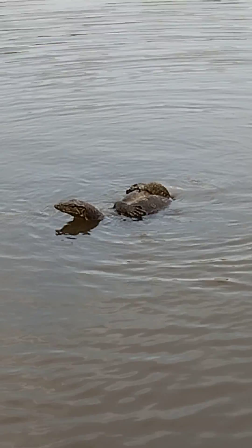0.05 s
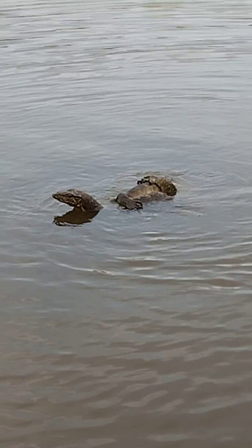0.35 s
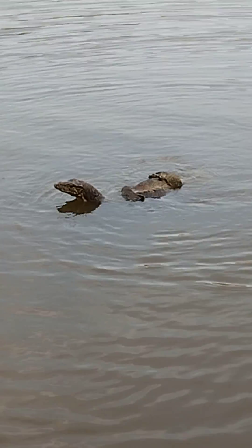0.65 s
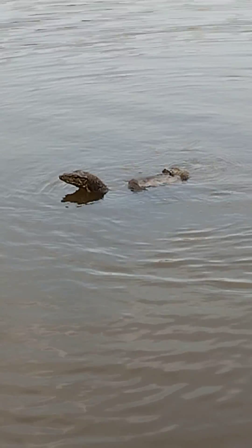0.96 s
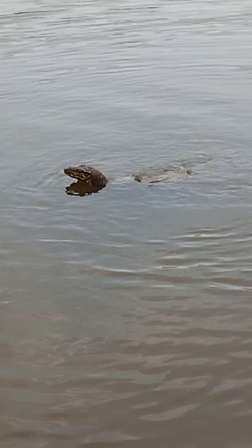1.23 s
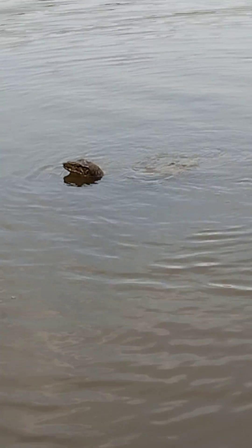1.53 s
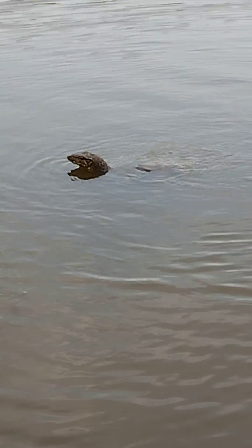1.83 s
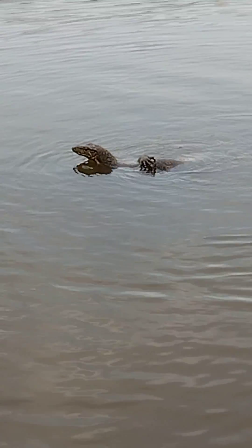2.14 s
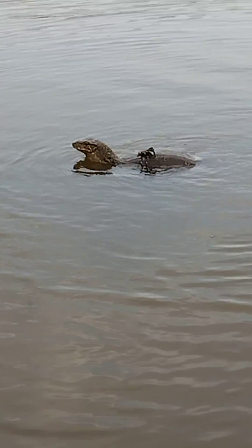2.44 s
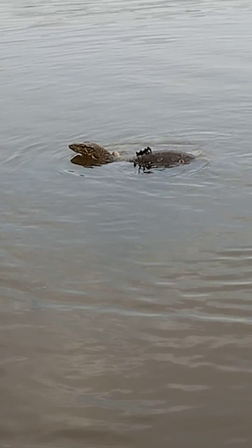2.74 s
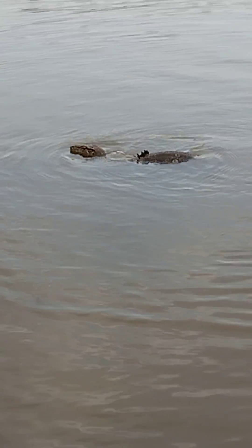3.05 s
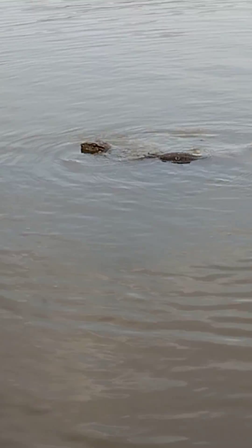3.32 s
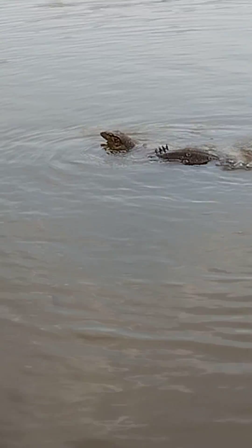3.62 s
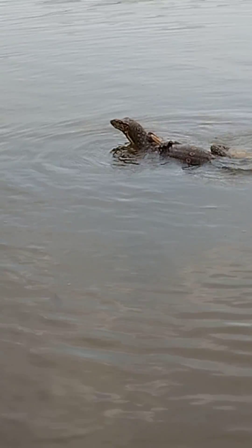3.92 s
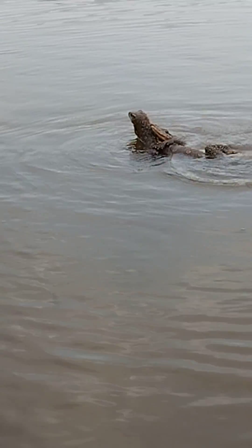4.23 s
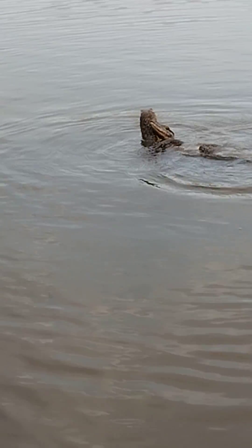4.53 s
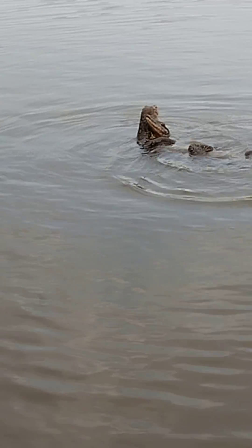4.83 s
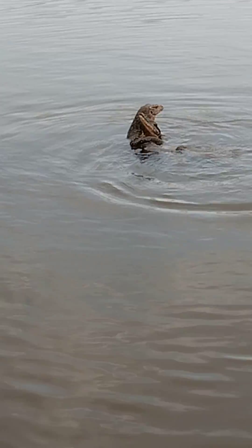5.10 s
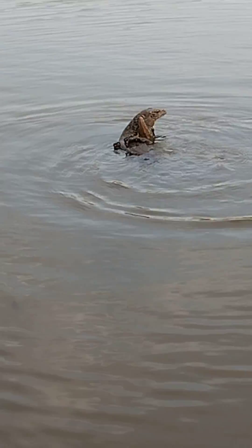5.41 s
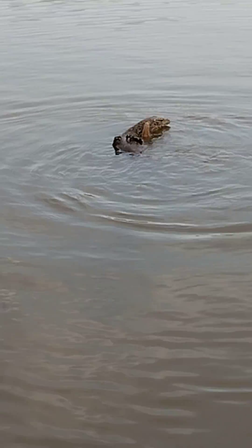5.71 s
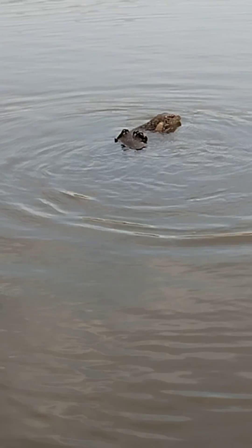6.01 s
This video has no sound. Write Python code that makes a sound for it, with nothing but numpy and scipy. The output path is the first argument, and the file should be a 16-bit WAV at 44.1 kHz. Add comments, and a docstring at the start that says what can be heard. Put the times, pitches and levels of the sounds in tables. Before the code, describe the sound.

Heard from the edge of a pond, a steady chorus of twittering birds and hissing insects sits over a faint rumble and far motor hum. Nearer birds screech hoarsely, interrupted by one sharp, close click. Short pips, thin high whistles and dry chattering calls follow, echoing lightly among the trees. In the second half, faint bubbles pop nearby as the birds give a few sliding screeches and a squeal.

```python
"""Rasping screeches come first, from birds squabbling in the trees round a pond. Their thin whistles,
dry chacks and falling pips, each a wavering tone from the syrinx, reach the microphone scattered by
the foliage. Farther back, small birds twitter and insects hiss over a low distant rumble and a motor.
Close to the microphone a small hard thing clicks sharply on the right; later, bubbles plop faintly."""
import sys
import numpy as np
from scipy import signal
from scipy.io import wavfile

SR = 44100
rng = np.random.default_rng(int(sys.argv[2]) if len(sys.argv) > 2 else 0)


def inscribe(sig):
    """Save sig as 16-bit PCM at rate SR to the path in sys.argv[1].

    A 1-D sig is mono; a 2-D sig holds one channel per row.
    Samples are clipped to [-1, 1] before scaling.
    """
    pcm = np.round(np.clip(np.atleast_2d(sig).T, -1, 1) * 32767)
    wavfile.write(sys.argv[1], SR, pcm.astype(np.int16))


N = 267246

# Call levels are at the bird, before beak and trees. tilt_db is added per harmonic;
# rasp_share is the pitch jitter as a share of the pitch.
# slurred screeches: start_s, length_s, start_hz, middle_hz, end_hz, level_db, tilt_db, rasp_share
SCREECH_NOTES = [(0, 0.12, 2084, 2038, 2034, -42.5, -8, 0.071),
                 (.132, .15, 2080, 2040, 1950, -42.5, -11, 0.076),
                 (0.551, 0.049, 2480, 2403, 2350, -48, 15.5, 0.086),
                 (.665, 0.056, 2350, 2197, 2085, -38, -8, 0.052),
                 (.809, 0.066, 2410, 2302, 2160, -41, -1, 0.066),
                 (0.962, 0.09, 2397, 2060, 2033, -42.5, -12, 0.067),
                 (1.123, 0.074, 2322, 2143, 2243, -39.5, -7, 0.055),
                 (4.012, 0.064, 1874, 2015, 2040, -42.5, -15.5, 0.092)]
# short dry chacks: start_s, length_s, pitch_hz, level_db, tilt_db, rasp_share
CHACK_NOTES = [(0.372, 0.021, 1680, -46, -12.5, 0.067), (0.424, 0.013, 1535, -45, -8, 0.077),
               (1.963, 0.029, 1676, -42.5, 3.5, 0.051), (2.074, 0.04, 1656, -42.5, 2.5, 0.049),
               (2.23, 0.049, 1695, -44.5, 4.5, 0.066), (2.386, 0.069, 1670, -57.5, 10, 0.059),
               (2.6, 0.044, 1696, -45, 3.5, 0.066), (2.713, 0.082, 1720, -45, -1, 0.088),
               (2.864, 0.064, 1683, -44.5, 6.5, 0.06), (3.04, 0.069, 1566, -45, 6.5, 0.087),
               (3.302, 0.082, 1691, -44, 3.5, 0.041), (3.516, 0.048, 1708, -46, -9, 0.079),
               (4.413, 0.0064, 1670, -40.5, -12, 0.057), (4.562, 0.0079, 1604, -42.5, -4.5, 0.054),
               (4.604, 0.037, 1700, -41.5, -4, 0.087), (4.85, 0.084, 1754, -52.5, 2.5, 0.068),
               (4.978, 0.013, 1562, -46.5, 2, 0.13), (5.224, 0.01, 1654, -44.5, 4, 0.051),
               (5.452, 0.027, 1620, -46, 7, 0.064), (5.647, 0.026, 1782, -46.5, -8, 0.079),
               (5.884, 0.018, 1684, -49, -11, 0.046), (5.988, 0.018, 1640, -40.5, -9.5, 0.028)]
# a low snarl in two pushes: start_s, length_s, start_hz, end_hz, level_db, tilt_db
SNARL_NOTES = [(4.116, 0.1033, 1254, 1235, -43, 2.5), (4.212, .094, 1168, 1099, -44.5, 1)]
# quick falling pips: start_s, length_s, start_hz, level_db
PIP_NOTES = [(0.553, 0.0133, 3047, -42.5), (0.806, 0.0076, 2870, -42), (0.96, 0.012, 2850, -42.5),
             (1.117, 0.011, 2830, -45.5), (1.279, 0.024, 2934, -45), (1.318, 0.015, 2680, -43),
             (1.349, 0.019, 2330, -49), (1.396, 0.011, 2494, -44.5), (1.468, 0.0055, 1880, -54.5),
             (1.495, 0.016, 2777, -46), (1.528, 0.02, 2260, -51.5), (1.564, 0.0088, 2670, -46.5),
             (1.664, 0.0076, 2470, -50), (1.692, 0.017, 2900, -42.5), (1.723, 0.0081, 2950, -45),
             (1.785, .007, 1870, -57), (1.811, 0.024, 2920, -44.5), (1.844, 0.008, 2860, -47.5),
             (2.54, 0.0069, 2890, -53.5), (2.754, 0.0078, 3390, -44), (3.116, 0.0049, 2635, -47.5),
             (3.542, 0.012, 3087, -44), (3.955, 0.031, 2940, -48.5), (4.015, 0.0088, 2350, -50)]
# timbre of each voice, from the fundamental up: harmonic_db
SCREECH_TIMBRE = [-22.5, 8.5, -22, -22.5]
CHACK_TIMBRE = [-27, -2, 2, -11.5]
SNARL_TIMBRE = [-40, -6, -3.5, -1]
PIP_TIMBRE = [-3.5, -11, -29]
# thin whistles, and hoarse calls from far off: start_s, length_s, start_hz, end_hz, level_db
WHISTLE_NOTES = [(.02, 0.33, 6060, 6200, -60), (.57, 0.086, 2840, 2777, -55.5),
                 (.59, 0.058, 5900, 6080, -60), (.875, 0.17, 6300, 6400, -65),
                 (1.3, 0.29, 6050, 6080, -59.5), (1.56, 0.22, 6200, 6500, -58.5),
                 (1.87, 0.62, 5950, 5810, -60), (2.62, 0.52, 5980, 5820, -62),
                 (3.424, 0.4, 6010, 5790, -56), (3.848, 0.045, 4070, 4047, -45),
                 (5.734, 0.31, 6550, 6680, -64.5), (5.93, 0.13, 5880, 5880, -55)]
HOARSE_NOTES = [(2.55, 0.081, 2830, 2790, -64), (2.75, 0.36, 2557, 2373, -66),
                (4.91, .23, 1430, 1608, -66.5), (4.98, 0.71, 2330, 2224, -72)]
# drawn-out calls, one curve each: time_s, pitch_hz, level_db, tilt_db
SINKING_CURVE = [(3.745, 1698, -39.5, 6), (3.811, 1584, -43, 6), (3.838, 1385, -43, 9),
                 (3.854, 1209, -45.5, 8), (3.876, 976, -50, 4)]
RISING_CURVE = [(4.64, 1565, -48, 4), (4.67, 1683, -41.5, -5), (4.695, 1916, -41, -10),
                (4.713, 2330, -40, -12), (4.752, 2418, -41.5, -14), (4.787, 2625, -51, -15)]
SQUEAL_CURVE = [(5.236, 2600, -51, 2.3), (5.256, 2800, -47, 2), (5.33, 2742, -47, 2),
                (5.39, 2684, -50, 2.3), (5.428, 2690, -48.5, 2), (5.44, 2680, -52, 1.8),
                (5.462, 2560, -46, 2.3)]
END_SLUR_CURVE = [(5.481, 1620, -42.5, 15.5), (5.503, 1467, -45.5, 13), (5.518, 1200, -50, 17),
                  (5.529, 990, -60, 20)]
# resonances of throat and beak: centre_hz, width_hz, gain_db
THROAT_RESONANCES = [(2520, 480, -3), (3670, 540, 9.5), (4370, 450, 3.5), (5140, 450, -5),
                     (6950, 1000, -2.5)]
# swell of the far birds and insects: time_s, gain_db
CHORUS_SWELL = [(0, -48), (.4, -52), (1.15, -51), (2.2, -53), (2.5, -58), (2.85, -52), (3.3, -53.5),
                (3.85, -51), (4.35, -52.5), (4.56, -58), (4.8, -52), (5.15, -57), (5.42, -51),
                (5.75, -53.5), (6.06, -54.5)]
# spectra of the insect hiss and the distant rumble: frequency_hz, relative_density_db
INSECT_SPECTRUM = [(1500, -26.5), (1950, -21), (2300, -14), (2800, -17.5), (3500, -7), (4700, -12),
                   (5600, -6), (6500, -13.5), (8000, -23), (9500, -75), (11200, -26.5), (13000, -44),
                   (15500, -38)]
RUMBLE_SPECTRUM = [(20, 3), (50, -1.5), (100, -5), (190, -6.5), (350, -14), (700, -17.5), (1300, -22),
                   (2500, -29), (6000, -57), (12000, -58)]
# how alike that noise is on the microphone's left and right: frequency_hz, correlation
STEREO_LIKENESS = [(25, 0.6), (60, 0), (125, 0.85), (250, 0.48), (500, 0.44), (1000, 0.11), (16000, 0.0045)]
# one thin insect high above the chorus: centre_hz, width_hz, level_db
SHRILL_BANDS = [(10750, 900, -80.5), (15500, 700, -92)]
# the click and two light touches after it: start_s, strength_db, tilt_db_per_octave
CLICK_HITS = [(.4617, -26, 0), (.4777, -46, -1), (.5131, -48, 5)]
# modes of the clicked thing: pitch_hz, gain_db, t60_s
CLICK_RESONANCES = [(287, -19.5, 0.053), (680, -31, 0.073), (1010, -38, 0.027), (1530, -20, 0.032),
                    (2050, -6.5, 0.02), (2450, -2, 0.0068), (3550, 3.5, 0.0042), (5940, -9, 0.0051),
                    (8470, -14, 0.0038), (11800, -12, 0.0031), (15200, -13, 0.004)]
# bubbles close by: start_s, peak_db, pitch_hz, t60_s
BUBBLES = [(3.452, -52, 2070, .03), (3.453, -59, 970, 0.031), (3.582, -54.5, 1370, 0.041),
           (3.696, -59.5, 930, 0.044), (4.619, -49, 893, 0.025), (4.620, -60, 1370, 0.024),
           (4.633, -56, 870, .03), (4.905, -44, 567, 0.016), (4.906, -51.5, 1290, 0.02),
           (4.958, -56.5, 510, 0.026)]

RASP_HZ, HISS_GAIN = 700, 3.6  # speed of the rasp, strength of the hiss it drives
ACCENT_DB, ACCENT_S = 5, 0.005  # a syllable bursts out louder, then settles
OPENING_SHARE = .08  # part of its length that a syllable takes to open


def from_db(db):
    return 10 ** (np.asarray(db) / 20)


def rms_one(x):
    return x / np.sqrt(np.mean(x ** 2) + 1e-20)


def at_hz(points, hz):
    """Read a spectrum on a log-frequency axis."""
    points_hz, values = np.transpose(points)
    return np.interp(np.log(hz), np.log(points_hz), values)


def wander(rate_hz, size, run_in=8000):
    """Smooth random drift of mean 0 and spread 1: noise through two one-pole low-passes."""
    r = np.exp(-2 * np.pi * rate_hz / SR)
    slow = signal.lfilter([1], [1, -2 * r, r * r], rng.standard_normal(size + run_in))[run_in:]
    return rms_one(slow - slow.mean())


def add(track, start_s, sound):
    """Mix a sound into a track."""
    start = int(np.clip(start_s * SR, 0, N - 1))
    track[start:start + len(sound)] += sound[:N - start]


def swell(size, attack_s, release_s):
    """Envelope of one note, with quarter-sine edges."""
    t = np.arange(size) / SR
    attack = np.sin(np.pi / 2 * np.minimum(t / attack_s, 1))
    release = np.sin(np.pi / 2 * np.minimum(t[::-1] / release_s, 1))
    return attack * release


def glide(pitches, size, jitter, jitter_hz):
    """Phase of a tone that slides unsteadily through some pitches."""
    hz = np.interp(np.linspace(0, 1, size), np.linspace(0, 1, len(pitches)), pitches)
    return 2 * np.pi * np.cumsum(hz * (1 + jitter * wander(jitter_hz, size))) / SR


def resonate(x, hz, width_hz):
    """One resonance with gain 1 at its peak."""
    return signal.lfilter(*signal.iirpeak(hz, hz / width_hz, fs=SR), x)


def resonant_noise(bands, shape):
    """Noise coloured by each resonance twice, so the valleys stay dark."""
    out = 0
    for hz, width_hz, db in bands:
        band = resonate(rng.standard_normal(shape), hz, width_hz)
        out += from_db(db) * rms_one(resonate(band, hz, width_hz))
    return out


def throat_noise():
    """Turbulent breath through a bird's throat; rms 1."""
    return rms_one(resonant_noise(THROAT_RESONANCES, N))


def syllables(notes, timbre, flutter_db_per_rasp, hiss_db, release_s=0.015, flutter_hz=260):
    """Harsh syllables: the rasp shakes pitch and loudness and drives puffs of hiss through the throat."""
    tones, breath = np.zeros(N), np.zeros(N)
    orders = np.arange(len(timbre)) + 1
    for start_s, length_s, *pitches, db, tilt_db, rasp in notes:
        size = int(length_s * SR)
        phase = glide(pitches, size, rasp, RASP_HZ)
        voice = rms_one(from_db(timbre + tilt_db * orders) @ np.sin(np.outer(orders, phase)))
        accent_db = ACCENT_DB * np.exp(-np.arange(size) / SR / ACCENT_S)
        flutter = from_db(accent_db + flutter_db_per_rasp * rasp * wander(flutter_hz, size))
        effort = from_db(db) * rms_one(flutter * swell(size, OPENING_SHARE * length_s, release_s))
        add(tones, start_s, voice * effort)
        add(breath, start_s, HISS_GAIN * rasp * effort)
    return tones + from_db(hiss_db) * breath * throat_noise()


def drawn_out(curve, rasp, hiss_db, flutter_db=4.5, flutter_hz=260):
    """One long screech whose pitch, strength and brightness follow a curve."""
    times_s, *columns = np.transpose(curve)
    size = int((times_s[-1] - times_s[0]) * SR)
    t = times_s[0] + np.arange(size) / SR
    hz, db, tilt_db = [np.interp(t, times_s, column) for column in columns]
    orders = np.arange(len(SCREECH_TIMBRE))[:, None] + 1
    gains = from_db(np.array(SCREECH_TIMBRE)[:, None] + tilt_db * orders)
    phase = glide(hz, size, rasp, RASP_HZ)
    voice = (gains * np.sin(orders * phase)).sum(0) / np.linalg.norm(gains, axis=0)
    flutter = rms_one(from_db(flutter_db * wander(flutter_hz, size)))
    effort = from_db(db) * flutter * swell(size, 0.0018, 0.006)
    out = np.zeros(N)
    add(out, times_s[0], effort * (rms_one(voice) + from_db(hiss_db) * throat_noise()[-size:]))
    return out


def over_water(x, comb_hz=685, mirror=.5):
    """The pond mirrors a call to the microphone a moment later and combs its spectrum."""
    n = np.arange(N)
    reflection = np.interp(n - SR / comb_hz, n, x, left=0)
    return (x + mirror * reflection) / np.hypot(1, mirror)


def chatter(band_hz=(1750, 7100), chack_fall_oct=0.0707, snarl_rasp=0.0685):
    """Screeches, sagging chacks that glance off the pond, a snarl; distance takes off the top."""
    chack_notes = [(start_s, length_s, hz, hz * 2 ** -chack_fall_oct, *voice)
                   for start_s, length_s, hz, *voice in CHACK_NOTES]
    snarl_notes = [(*note, snarl_rasp) for note in SNARL_NOTES]
    chacks = syllables(chack_notes, CHACK_TIMBRE, flutter_db_per_rasp=51, hiss_db=-.5)
    screeches = syllables(SCREECH_NOTES, SCREECH_TIMBRE, flutter_db_per_rasp=52, hiss_db=-1.5)
    snarl = syllables(snarl_notes, SNARL_TIMBRE, flutter_db_per_rasp=35, hiss_db=6.5)
    rising_call = drawn_out(RISING_CURVE, rasp=.035, hiss_db=-9, flutter_db=3)
    calls = screeches + from_db(2) * over_water(chacks) + snarl + rising_call
    return signal.sosfilt(signal.butter(5, band_hz, "band", fs=SR, output="sos"), calls)


def beak(x, top_hz=8600):
    """The open beak adds a narrow resonance with a dip above it, and passes little high treble."""
    peak = from_db(-6) * resonate(x, hz=5320, width_hz=260)
    dip = 0.55 * resonate(x, hz=6300, width_hz=500)
    return signal.sosfilt(signal.butter(8, top_hz, fs=SR, output="sos"), x + peak - dip)


def trees(x, direct_db, near_db, far_db, lag_s, near_t60_s=0.16, far_t60_s=1.0):
    """Three paths to the microphone: direct, quickly off nearby branches, slowly from the far banks."""
    t = np.arange(SR) / SR
    channels = []
    for side in range(2):
        twigs = rng.standard_normal((2, SR)) * (rng.random((2, SR)) < [[.03], [.15]])  # sparse echoes
        echoes = twigs * from_db(-60 * t / [[near_t60_s], [far_t60_s]]) * (t > .002)
        echoes /= np.linalg.norm(echoes, axis=1, keepdims=True)
        path = from_db(near_db) * echoes[0] + from_db(far_db) * echoes[1]
        path[int(lag_s * SR) * side] += from_db(direct_db)  # reaches the right side later
        channels.append(signal.fftconvolve(x, path)[:N])
    return np.array(channels)


def far_birds(count=1100, centre_hz=5000, pitch_spread=.1, distance_db=1.5):
    """Many small chirps at random times, pitches and distances; rms 1."""
    out = np.zeros(N)
    for (when, stretch), (pitch, loud) in zip(rng.random((count, 2)), rng.standard_normal((count, 2))):
        size = int((.03 + .05 * stretch) * SR)
        hz = centre_hz * np.exp(pitch_spread * np.clip(pitch, -3, 1.8))
        phase = glide([hz, hz * 1.03, hz * .96], size, jitter=.03, jitter_hz=304)
        chirp = np.sin(phase) * swell(size, 0.01, 0.07)
        add(out, when * N / SR, from_db(distance_db * loud) * chirp)
    return rms_one(out)


def distant_noise(spectrum, flicker_db):
    """Hiss or rumble from all round, each band with its own level, flicker and stereo width; rms 1."""
    edges_hz = np.r_[np.geomspace(18, 1500, 12), np.geomspace(1800, 16500, 16)]
    white = rng.standard_normal((2, 2, N))
    out = 0
    for k, (low, high) in enumerate(zip(edges_hz, edges_hz[1:])):
        band = signal.butter(2, [low, high], "band", fs=SR, output="sos")
        mid, side = signal.sosfilt(band, white[k % 2])
        hz = np.sqrt(low * high)
        alike = at_hz(STEREO_LIKENESS, hz)
        gain = from_db(at_hz(spectrum, hz) + flicker_db * wander(8.5, N))
        out += gain * (np.sqrt(1 + alike) * mid + np.sqrt(1 - alike) * side * [[1], [-1]])
    return rms_one(out)


def far_motor(pitch_hz=181, level_db=-74.5):
    """A motor a long way off hums, drifting slightly in level and pitch."""
    level = from_db(level_db + 0.88 * wander(2.4, N))
    return level * np.sin(glide([pitch_hz, pitch_hz], N, jitter=0.0097, jitter_hz=8.9))


def cricket():
    """Narrow, steady bands of shrilling on both sides of the microphone."""
    return resonant_noise(SHRILL_BANDS, (2, N))


def whistles(notes, waver, waver_hz, flutter_db=5.0):
    """Thin notes that waver in pitch and loudness; a deep waver turns them hoarse."""
    out = np.zeros(N)
    for start_s, length_s, *pitches, db in notes:
        size = int(length_s * SR)
        effort = swell(size, 0.0091, 0.027) * from_db(flutter_db * wander(130, size))
        tone = np.sin(glide(pitches, size, waver, waver_hz))
        add(out, start_s, from_db(db) * rms_one(tone * effort))
    return out


def ring(hits, hz, t60_s):
    """A unit hit sets a sine of height 1 ringing."""
    r, w = from_db(-60 / (t60_s * SR)), 2 * np.pi * hz / SR
    return signal.lfilter([0, np.sin(w)], [1, -2 * r * np.cos(w), r * r], hits + 1e-18)


def click(pan_db=1.5, lag_s=0.00036, echo_s=.00101, echo_db=-1, echo_hz=4000, shade_hz=5500):
    """A small hard thing snaps close by on the right; a duller, inverted reflection follows at once."""
    snap = np.zeros(N)
    for hz, mode_db, t60_s in CLICK_RESONANCES:
        hits = np.zeros(N)
        for start_s, db, tilt in CLICK_HITS:
            add(hits, start_s, from_db([db + mode_db + tilt * np.log2(hz / 2400)]))
        snap += ring(hits, hz, t60_s)
    snap = signal.lfilter(*signal.butter(1, 700, "high", fs=SR), snap)  # too small to radiate much bass
    reflection = signal.lfilter(*signal.butter(1, echo_hz, fs=SR), snap)
    right = snap - from_db(echo_db) * np.roll(reflection, round(echo_s * SR))
    shaded = signal.lfilter(*signal.butter(1, shade_hz, fs=SR), right)  # the microphone's far side
    left = np.roll(shaded, round(lag_s * SR))
    return np.array([left, right]) * from_db([[-pan_db], [pan_db]])


def pips(fall_oct_per_s=22, rasp=0.048):
    """Very short, ragged slurs with a puff of hiss, all falling at the same rate."""
    notes = [(start_s, length_s, hz, hz * 2 ** (-fall_oct_per_s * length_s), db, 0, rasp)
             for start_s, length_s, hz, db in PIP_NOTES]
    return syllables(notes, PIP_TIMBRE, flutter_db_per_rasp=48, hiss_db=9, release_s=0.0016)


def plops(rise_per_s=6):
    """Small bubbles near the microphone ring briefly, rising in pitch as they reach the surface."""
    out, t = np.zeros(N), np.arange(SR // 10) / SR
    for start_s, db, hz, t60_s in BUBBLES:
        phase = 2 * np.pi * hz * t * (1 + rise_per_s * t / 2)
        add(out, start_s, from_db(db - 60 * t / t60_s) * np.sin(phase))
    return out


def open_calls():
    """A bird out in the open: a screech that sinks, then an arched squeal ending in a falling slur."""
    return (drawn_out(SINKING_CURVE, rasp=.06, hiss_db=-10)
            + drawn_out(SQUEAL_CURVE, rasp=.018, hiss_db=-24, flutter_hz=110)
            + drawn_out(END_SLUR_CURVE, rasp=.055, hiss_db=-7))


def scene():
    """From the pond's edge: birds ring in the trees; all else reaches the microphone directly."""
    calls = trees(beak(chatter()), direct_db=-10, near_db=-2, far_db=-8, lag_s=.0004)
    calls += trees(beak(open_calls()), direct_db=-6, near_db=-3, far_db=-6.5, lag_s=.00005)
    calls += trees(beak(pips()), direct_db=-4, near_db=-7, far_db=-10, lag_s=.00006)
    thin = whistles(WHISTLE_NOTES, waver=0.0139, waver_hz=182)
    hoarse = whistles(HOARSE_NOTES, waver=.085, waver_hz=302)
    calls += trees(thin + hoarse, direct_db=-15, near_db=-1.5, far_db=-8, lag_s=.00027)
    twitter = from_db(-2) * trees(far_birds(), direct_db=-5, near_db=-4, far_db=-1.5, lag_s=.0001)
    insects = from_db(-2.5) * distant_noise(INSECT_SPECTRUM, flicker_db=3)
    swell_db = np.interp(np.arange(N) / SR, *np.transpose(CHORUS_SWELL))
    chorus = from_db(swell_db) * (twitter + insects)
    wildlife = (calls + chorus) * from_db([[-.4], [.4]])  # a touch louder on the right
    rumble = from_db(-61.5) * distant_noise(RUMBLE_SPECTRUM, flicker_db=1.26)
    return wildlife + rumble + far_motor() + cricket() + click() + plops()


def record(dry, dip_hz=13400, dip_q=1.555, port_hz=15500, port_q=5.3, port_db=7, cutoff_hz=16000):
    """The microphone port has a dip and a resonance in the high treble; above them the top is cut."""
    x = signal.lfilter(*signal.iirnotch(dip_hz, dip_q, fs=SR), dry)
    x = x + from_db(port_db) * signal.lfilter(*signal.iirpeak(port_hz, port_q, fs=SR), x)
    return signal.sosfilt(signal.ellip(10, .1, 80, cutoff_hz, fs=SR, output="sos"), x)


dry = scene()
out = record(dry)
inscribe(out)
```